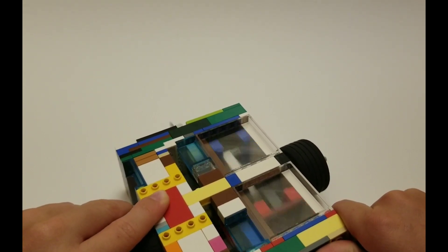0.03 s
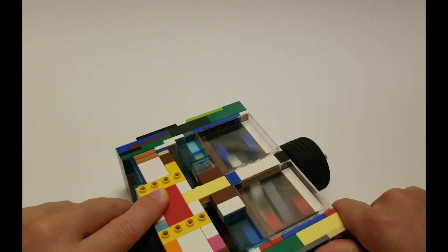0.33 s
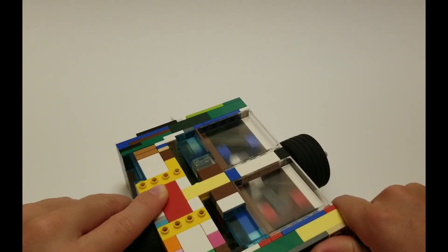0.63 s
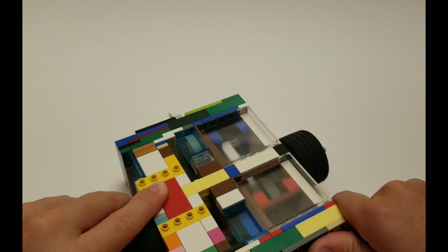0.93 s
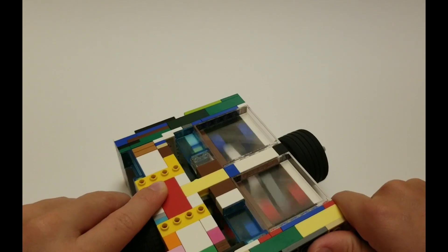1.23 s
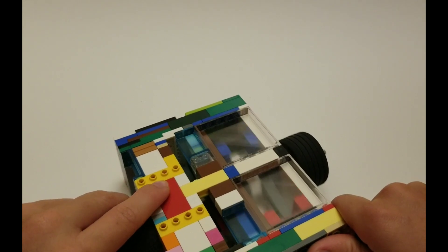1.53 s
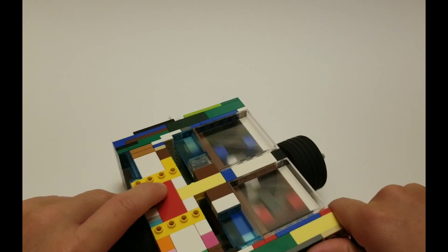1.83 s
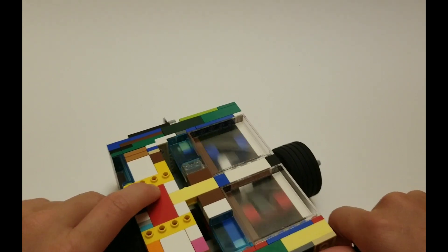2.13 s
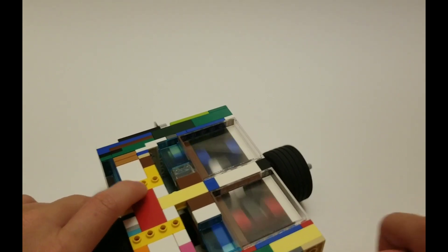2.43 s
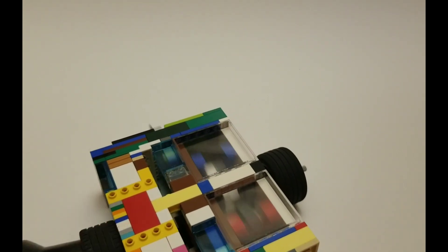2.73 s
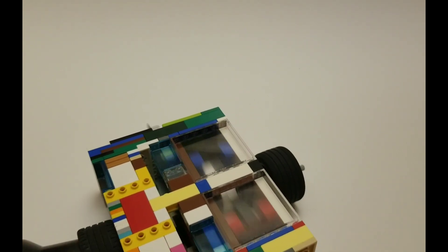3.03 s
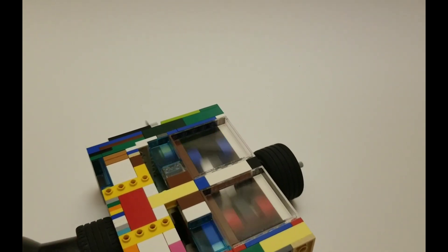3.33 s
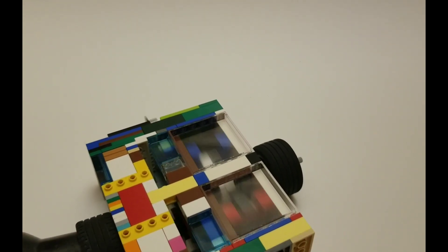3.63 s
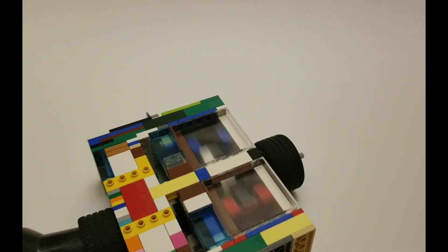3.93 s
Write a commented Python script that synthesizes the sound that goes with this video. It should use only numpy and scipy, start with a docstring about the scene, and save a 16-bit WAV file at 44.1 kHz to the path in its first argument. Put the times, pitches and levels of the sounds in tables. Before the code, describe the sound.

A toy piston engine of plastic bricks clatters loudly and rapidly, close by in a small room, driven by a vacuum cleaner. The clatter dies down with two soft bumps, leaving rushing air, thin whistles and motor whine.

```python
"""In a small room, a toy piston engine of plastic bricks runs on a vacuum cleaner's suction. In each turn,
about 14 a second, loose parts knock in the same order and the engine shakes with low thumps, the piston pings
and air is gulped through the cylinder. The clatter dies down as the hands let go, with two soft bumps. That
leaves the rush of air, thin whistles and the whine of the suction motor."""
import sys
import numpy as np
from scipy import signal
from scipy.fft import rfft, irfft
from scipy.io import wavfile
from scipy.ndimage import uniform_filter1d, minimum_filter1d

SR = 44100
rng = np.random.default_rng(int(sys.argv[2]) if len(sys.argv) > 2 else 0)


def master(y):
    """Save y as 16-bit WAV."""
    cut = np.clip(np.atleast_2d(y).T, -1, 1)
    pcm = np.round(cut * 32767)  # scale
    wavfile.write(sys.argv[1], SR, pcm.astype(np.int16))


N = 176400
T = np.arange(N) / SR

# How fast the crank turns: (time [s], speed [turns/s])
CRANK_SPEED = [(0.0, 14.319), (0.5, 14.437), (0.95, 14.516), (1.27, 13.801), (1.58, 14.228), (1.75, 13.866),
               (2.0, 13.791), (2.47, 12.99), (2.7, 13.425), (4.0, 13.213)]
# How hard the parts knock: (time [s], gain [dB])
KNOCK_FORCE = [(0, 2), (1.2, 0.5), (1.6, -1.5), (2.0, -2), (2.3, -5.5), (2.6, -10.5), (2.9, -16),
               (3.3, -29), (4, -36)]
# Pitches at which each knock's tone colour is set: (frequency [Hz])
COLOUR_HZ = [700, 1800, 2550, 5000, 7000, 10500]
# One turn's knocks: (place [turns], rattle time [s], low shake [dB], gain at each COLOUR_HZ [dB])
KNOCKS = [(.015, 0.0026, -6, -3.5, -7, 4, 1.5, -7, -3), (.113, 0.0021, 3, 1.5, -9.5, 5.5, 1, 0, 4.5),
          (.215, 0.0026, 0.5, -6.5, -4, 2, 5, 0.5, 4), (.285, 0.0013, -16, -2, -2, -5.5, 1.5, -0.5, -8),
          (.512, 0.0046, 1, 2, -5, -4, -14, 1.5, 1), (.680, 0.0032, -1, 0.5, 1, -3, 1, -4.5, -1.5),
          (.932, 0.0022, -15, -7.5, -1, -11, -29, -19, -11)]
# Modes of the brick frame, the notes it rings at: (frequency [Hz], width [Hz], gain [dB])
FRAME_MODES = [(462, 54, -7), (720, 300, -6.5), (1062, 51, 1), (1256.4, 49, 0), (1413, 263, -0.5),
               (1900, 466, 0), (2516, 106, -3.5), (2750, 160, -6.5), (4450, 740, -16), (5092, 695, -7),
               (7030, 240, -11.5), (7600, 430, -15.5), (9200, 3900, -24), (13800, 9000, -35)]
# Lighter knocks are brighter: (time [s], boost above BRIGHT_ABOVE_HZ [dB/octave])
BRIGHTNESS = [(0, -1.2), (1.1, -0.5), (1.6, 0), (2.1, 1.06), (2.4, 0.5), (2.8, 2), (4, 6)]
# How hollow the frame sounds: (time [s], gain below HOLLOW_BELOW_HZ [dB])
HOLLOWNESS = [(0, -2.5), (1.0, -0.5), (2.0, -0.5), (2.4, 3), (2.7, 3), (2.95, -5), (4, -7)]
# Low notes of the engine's shake: (frequency [Hz], width [Hz], gain [dB])
SHAKE_MODES = [(67, 29, -11.5), (110, 13, -13), (207, 92, -21), (281, 45, -22)]
# How strong the low shake is: (time [s], shake gain [dB])
SHAKE_LEVEL = [(0, -2), (1.1, -2), (1.6, 0), (2.2, 0), (2.7, 8), (4, 0)]
# How hard the piston pings: (time [s], gain [dB])
PING_LEVEL = [(0, -7), (1.2, -6.5), (1.8, -6), (2.15, -11), (2.45, -17), (2.95, -17), (3.2, -34), (4, -48)]
# Notes of the piston: (frequency [Hz], time to fade by 60 dB [s], gain [dB])
PING_MODES = [(2510, .026, -1), (2620, .018, -2), (2840, .012, -9), (6880, .016, -13), (7380, .012, -18)]
# How strong the gulps of air are: (time [s], gain [dB])
GULP_LEVEL = [(0, -11), (1.15, -11), (1.45, -17), (2.0, -22), (2.4, -21.5), (2.8, -26), (3.3, -38),
              (3.45, -47), (4, -33.5)]
# Pitch of the cylinder's hollow spaces: (time [s], frequency [Hz])
GULP_PITCH = [(0, 1862), (1.1, 1906), (1.6, 1884), (2.1, 1793), (2.4, 1536), (3.0, 1556), (3.3, 1497),
              (3.5, 1196), (4, 1140)]
# Notes of those spaces: (frequency [times that pitch], width [times that pitch], gain [dB])
GULP_MODES = [(.66, 0.091, -4.5), (0.861, 0.056, 1.5), (0.998, 0.17, 5), (1.091, 0.023, -18)]
# Soft bumps as the hands let go: (time [s], level [dB])
BUMPS = [(2.465, -27.5), (2.591, -29)]
# Tone colour of air in the engine and in the loosened nozzle: (frequency [Hz], gain [dB])
ENGINE_AIR_COLOUR = [(45, -48), (70, -15), (85, -32), (108, -3), (135, -14), (200, -5.5), (250, -19.5),
                     (285, -5.5), (380, -14), (460, -10.5), (520, -7), (900, -20), (1200, -2.5),
                     (2100, 0.5), (2550, 3), (2950, -8), (3300, -14), (3700, -13), (4300, -3), (4750, -0.5),
                     (5400, -7), (6200, -34.5), (6900, -13), (8200, -20.5), (10500, -28), (12700, -36.5),
                     (15500, -38)]
NOZZLE_AIR_COLOUR = [(45, -26), (70, -13), (85, -14), (108, -6.5), (135, -15), (215, -3), (250, -7),
                     (285, -3.5), (380, -3.5), (450, -7), (520, -15), (660, -9), (730, -11), (1000, -4.5),
                     (1400, -3.5), (1850, -18), (2100, -7), (2450, -0.5), (2900, 1), (3300, -11.5),
                     (3750, -14), (4150, -15), (4480, -1.5), (4950, -4.5), (5300, -12), (6200, -17.5),
                     (8200, -22), (10500, -24), (12700, -32), (15500, -29)]
# How loud those two streams of air are: (time [s], level [dB])
ENGINE_AIR_LEVEL = [(0, -25.5), (2.2, -22), (2.6, -26), (3.2, -26.5), (3.38, -35.5), (4, -38.5)]
NOZZLE_AIR_LEVEL = [(0, -18), (3.2, -33), (3.38, -28), (3.6, -28), (4, -29.5)]
# Thin whistles at the loosened nozzle: (frequency [Hz], width [Hz], gain [dB])
WHISTLES = [(3070, 50, 1), (4380, 25, -5), (4290, 36, -3)]
# How the whistles swell: (time [s], gain [dB])
WHISTLE_LEVEL = [(0, -70), (3.25, -58), (3.45, -45), (3.65, -47), (3.8, -37.5), (4, -41)]
# How fast the suction motor spins: (time [s], speed [turns/s])
MOTOR_SPEED = [(0, 334.4), (1.3, 330.4), (1.7, 332.5), (2.2, 332), (2.7, 335.4), (3.25, 333.6),
               (3.6, 333.3), (4, 333.1)]
# The motor's tones: (frequency [times the motor speed])
HARMONICS = [1, 2, 5, 7, 8, 12, 14]
# Each tone's level in four stages: (held [dB], let go [dB], nozzle loose [dB], settling [dB])
HARMONIC_LEVELS = [(-44, -39.5, -39.5, -40), (-40, -51.5, -48.5, -49), (-36.5, -40, -41, -37.5),
                   (-27, -38.5, -31.5, -37), (-44, -38.5, -41, -39), (-40, -42, -49, -58),
                   (-38, -40.5, -42, -41.5)]
# Start and end of each stage in turn: (time [s])
STAGE_TIMES = [0, 2.35, 2.75, 3.25, 3.42, 3.58, 3.85, 4]

KNOCK_GAIN_DB, KNOCK_SPREAD_DB, MODE_SPREAD_DB, JITTER_S = 24, 1.1, 1.0, .0004
RATTLE_CLICKS_PER_S, RATTLE_SIZE, RUBBING_DB = 8000, 1.8, -18
BRIGHT_ABOVE_HZ, HOLLOW_BELOW_HZ = 2000, 1000
PING_AT_TURN, PING_SPREAD_DB, PING_BOUNCE_S, PING_BOUNCE_DB = .526, 1.0, .0014, -14
GULP_AT_TURN, GULP_WIDTH_TURNS = 0.2, 0.14
AIR_FLUTTER_DB, AIR_FLUTTER_HZ = 1.5, 58.6
WHINE_WAVER_DB, WAVER_HZ, SPEED_WAVER = 1.3, 5.65, 0.001345
ROOM_FADE_S, ROOM_DB, ROOM_DELAY_S = 0.24, -9.5, 0.00208


def clatter(turns):
    """Loose parts knock and rattle; each knock rings the brick frame and the engine shakes low."""
    knocks = np.array(KNOCKS)
    place, rattle_s, thump_db = knocks[:, :3].T
    places = np.arange(np.ceil(turns[-1]))[:, None] + place  # one row for each turn
    times = np.interp(places, turns, T, left=-1, right=2 * T[-1])
    times += JITTER_S * rng.standard_normal(places.shape)
    strength = from_db(KNOCK_GAIN_DB + KNOCK_SPREAD_DB * rng.standard_normal(places.shape))
    delays, click_sizes = rattle(places.shape, rattle_s)
    force = from_db(in_time(KNOCK_FORCE))
    rubbing = from_db(RUBBING_DB) * rng.standard_normal(N)  # sliding pistons and axles
    frame = 0
    for hz, width_hz, db in FRAME_MODES:
        colour_db = np.array([np.interp(np.log(hz), np.log(COLOUR_HZ), row) for row in knocks[:, 3:]])
        sizes = strength * from_db(colour_db + MODE_SPREAD_DB * rng.standard_normal(places.shape))
        hits = clicks(times[..., None] + delays, sizes[..., None] * click_sizes)
        octaves_up = max(np.log2(hz / BRIGHT_ABOVE_HZ), 0)
        push = force * (hits + rubbing) * from_db(in_time(BRIGHTNESS) * octaves_up)
        gain = from_db(db + in_time(HOLLOWNESS) * (hz < HOLLOW_BELOW_HZ))
        frame += gain * resonate(push, hz, width_hz)
    return frame + low_shake(force * clicks(times, strength * from_db(thump_db)))


def rattle(shape, rattle_s):
    """A part rattles in a dense, fading burst of small clicks: gives their delays and sizes."""
    gaps = rng.exponential(1, size=shape + (96,)) / RATTLE_CLICKS_PER_S
    delays = np.cumsum(gaps, axis=2) - gaps[..., :1]
    sizes = RATTLE_SIZE * rng.standard_normal(gaps.shape) * np.exp(-delays / rattle_s[:, None])
    sizes[..., 0] = 2  # the first click
    return delays, sizes / np.sqrt(np.sum(sizes ** 2, axis=2, keepdims=True))


def low_shake(hits):
    """The engine shakes with a low boom along with the knocks, stronger at some times than others."""
    push = from_db(in_time(SHAKE_LEVEL)) * hits
    return sum(from_db(db) * resonate(push, hz, width_hz) for hz, width_hz, db in SHAKE_MODES)


def piston_pings(turns):
    """Once a turn the piston hits its stop, bounces lightly and rings."""
    times = np.interp(np.arange(np.floor(turns[-1])) + PING_AT_TURN, turns, T)
    size_chance, delay_chance = rng.standard_normal((len(times), 2)).T
    sizes = from_db(PING_SPREAD_DB * size_chance)
    bounce_times = times + PING_BOUNCE_S * from_db(2 * delay_chance)
    hits = clicks(times, sizes) + clicks(bounce_times, sizes * from_db(PING_BOUNCE_DB))
    hits *= from_db(in_time(PING_LEVEL))
    ringing = sum(from_db(db) * ring(hits, hz, fade_s) for hz, fade_s, db in PING_MODES)
    return cut_bass(ringing, hz=1170)  # so small a part gives off no bass


def air_gulps(turns):
    """The valve opens once a turn and air rings the cylinder; the pitch sinks as the engine weakens."""
    pitch = in_time(GULP_PITCH)
    top_hz = pitch.max()
    air = rng.standard_normal(N)
    ringing = sum(from_db(db) * resonate(air, ratio * top_hz, width * top_hz)
                  for ratio, width, db in GULP_MODES)
    gliding = np.interp(np.cumsum(pitch / top_hz), np.arange(N), ringing)  # slower sounds lower
    turns_from_open = (turns - GULP_AT_TURN + .5) % 1 - .5
    valve = np.exp(-.5 * (turns_from_open / GULP_WIDTH_TURNS) ** 2)
    return .5 * from_db(in_time(GULP_LEVEL)) * unit_level(gliding * valve)


def tyre_bumps():
    """The frame settles on its rubber tyres with dull, short bumps."""
    times, db = np.transpose(BUMPS)
    return ring(clicks(times, from_db(db)), hz=184, fade_s=0.12)


def airflow():
    """Swirling air rushes, changing colour and whistling thinly as the nozzle comes loose."""
    hiss = rng.standard_normal(N)
    whistles = sum(from_db(db) * unit_level(resonate(hiss, hz, width)) for hz, width, db in WHISTLES)
    engine = from_db(in_time(ENGINE_AIR_LEVEL)) * noise(ENGINE_AIR_COLOUR)
    nozzle = from_db(in_time(NOZZLE_AIR_LEVEL)) * noise(NOZZLE_AIR_COLOUR)
    flutter = from_db(AIR_FLUTTER_DB * drift(AIR_FLUTTER_HZ))
    return (engine + nozzle) * flutter + from_db(in_time(WHISTLE_LEVEL)) * whistles


def suction_motor():
    """The motor hums and whines at multiples of its speed, each tone wavering in level."""
    speed = in_time(MOTOR_SPEED) * (1 + SPEED_WAVER * drift(WAVER_HZ))
    angle = 2 * np.pi * np.cumsum(speed) / SR
    whine = 0
    for multiple, levels in zip(HARMONICS, HARMONIC_LEVELS):
        db = np.interp(T, STAGE_TIMES, np.repeat(levels, 2)) + WHINE_WAVER_DB * drift(WAVER_HZ)
        whine += np.sqrt(2) * from_db(db) * np.sin(multiple * angle + rng.uniform(0, 2 * np.pi))
    return whine


def room(x):
    """The table and near walls add many echoes that die quickly."""
    t = T[:SR // 2]
    echoes = rng.standard_normal(len(t)) * from_db(-60 * t / ROOM_FADE_S) * (t > ROOM_DELAY_S)
    echoes /= np.sqrt(np.sum(echoes ** 2))
    return x + from_db(ROOM_DB) * signal.fftconvolve(x, echoes)[:N]


def from_db(db):
    """Turn decibels into a number to multiply by."""
    return 10 ** (np.asarray(db) / 20)


def unit_level(x):
    """Scale a sound to an average power of 1."""
    return x / np.sqrt(np.mean(x ** 2) + 1e-20)


def in_time(rows):
    """Join (time, value) rows by straight lines."""
    return np.interp(T, *np.transpose(rows))


def drift(hz):
    """A random wobble of about size 1, mostly slower than hz."""
    f = np.arange(N // 2 + 1) * SR / N
    return unit_level(irfft(rfft(rng.standard_normal(N)) / (1 + (f / hz) ** 2), N))


def noise(colour):
    """Steady noise with the given tone colour."""
    f = np.arange(N // 2 + 1) * SR / N + 1e-3
    hz, db = np.transpose(colour)
    bass_fade = np.minimum(f / hz[0], 1) ** 2
    gain = from_db(np.interp(np.log(f), np.log(hz), db)) * bass_fade
    return unit_level(irfft(rfft(rng.standard_normal(N)) * gain, N))


def clicks(times, sizes):
    """One-sample clicks at the given times."""
    at = np.round(np.ravel(times) * SR).astype(int)
    inside = (at >= 0) & (at < N)
    return np.bincount(at[inside], np.ravel(sizes)[inside], N)


def resonate(x, hz, width_hz):
    """Keep the band around hz, as a ringing object does."""
    edges = np.clip([hz - width_hz / 2, hz + width_hz / 2], 10, .45 * SR)
    return signal.sosfilt(signal.butter(2, edges, "band", fs=SR, output="sos"), x + 1e-18)


def ring(x, hz, fade_s):
    """Each click starts a pure tone that falls 60 dB in fade_s."""
    decay, step = from_db(-60 / (fade_s * SR)), 2 * np.pi * hz / SR
    return signal.lfilter([0, np.sin(step)], [1, -2 * decay * np.cos(step), decay ** 2], x + 1e-18)


def cut_bass(x, hz):
    """Weaken the sound below hz."""
    return signal.sosfilt(signal.butter(2, hz, "high", fs=SR, output="sos"), x)


def scene():
    """The crank times the knocks, pings and gulps over the steady suction."""
    turns = np.cumsum(in_time(CRANK_SPEED)) / SR
    engine = clatter(turns) + piston_pings(turns) + air_gulps(turns)
    return (room(engine) + tyre_bumps() + airflow() + suction_motor())[None]


def record(dry):
    """The microphone drops deep bass, a fast limiter turns peaks down and the top treble is cut."""
    ceiling, span, top_hz = .92, int(.003 * SR), 15600
    thin = cut_bass(dry, hz=49.4)
    needed_gain = ceiling / np.maximum(np.abs(thin), ceiling)
    smooth_gain = uniform_filter1d(minimum_filter1d(needed_gain, span), span)
    return signal.sosfilt(signal.ellip(12, .1, 80, top_hz, fs=SR, output="sos"), thin * smooth_gain)


dry = scene()
out = record(dry)
master(out)
```